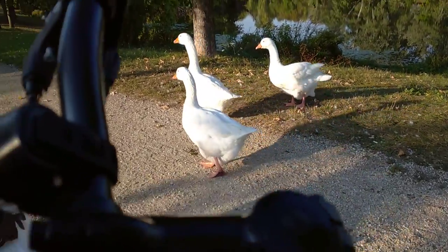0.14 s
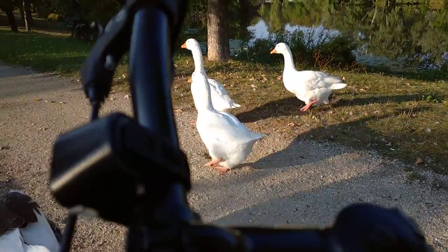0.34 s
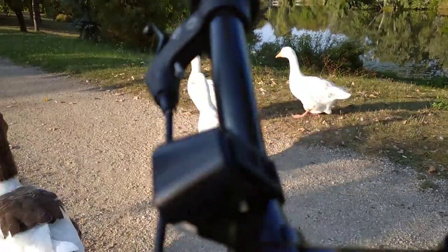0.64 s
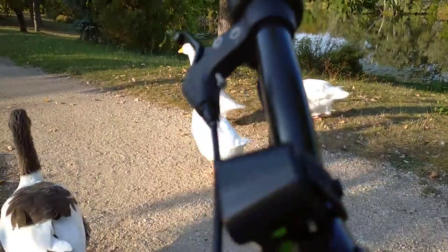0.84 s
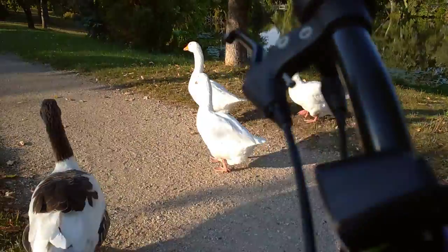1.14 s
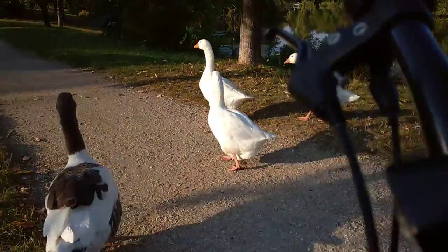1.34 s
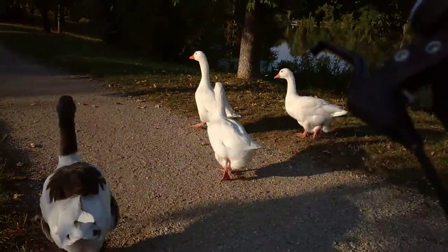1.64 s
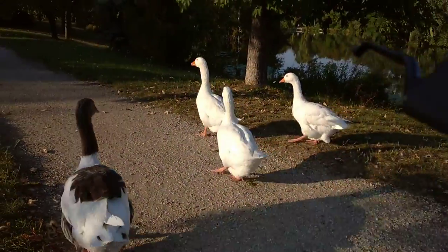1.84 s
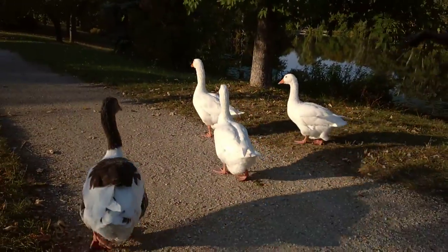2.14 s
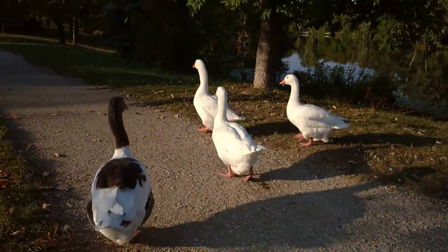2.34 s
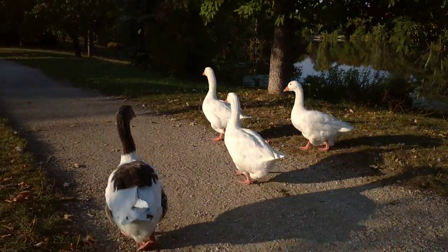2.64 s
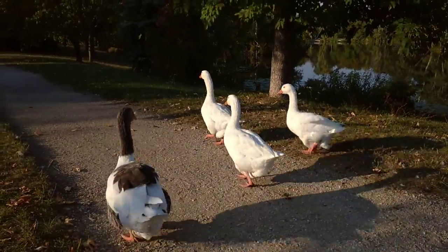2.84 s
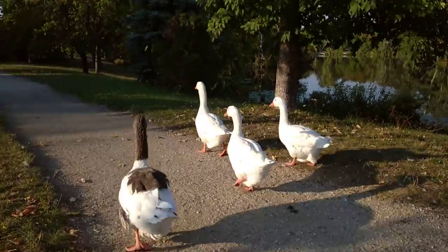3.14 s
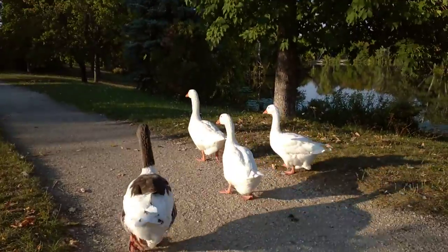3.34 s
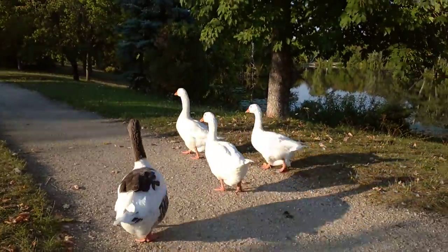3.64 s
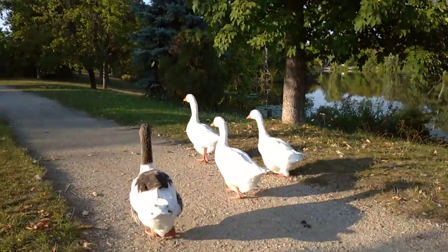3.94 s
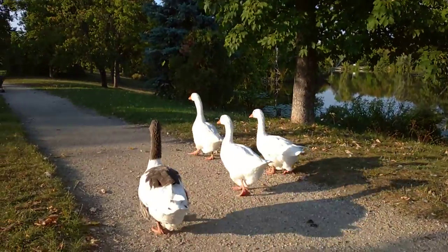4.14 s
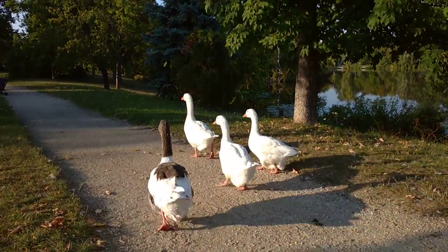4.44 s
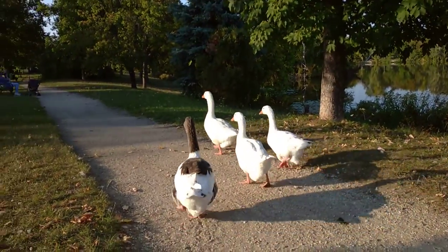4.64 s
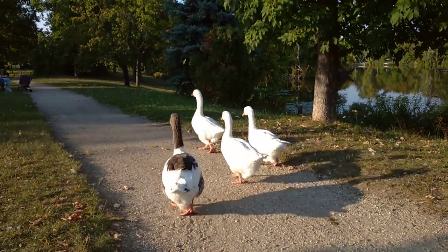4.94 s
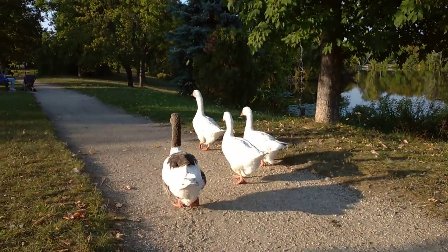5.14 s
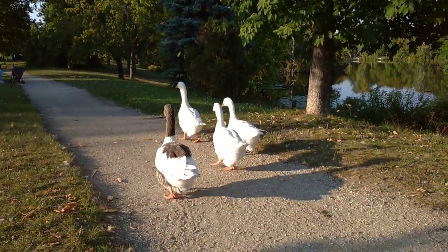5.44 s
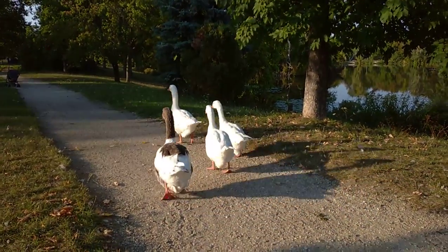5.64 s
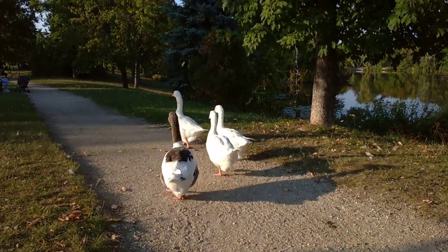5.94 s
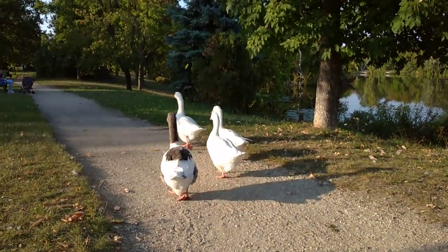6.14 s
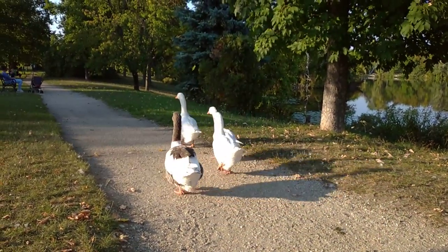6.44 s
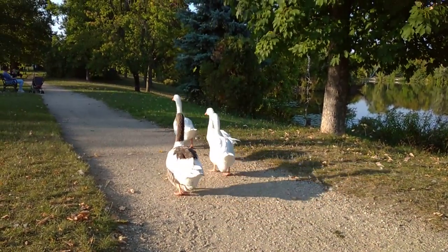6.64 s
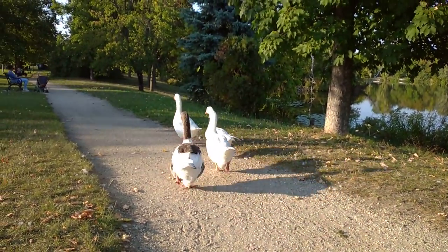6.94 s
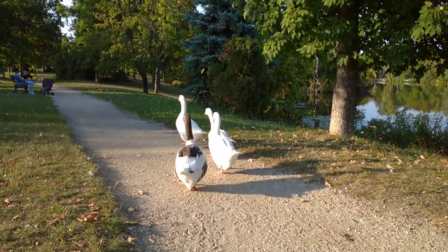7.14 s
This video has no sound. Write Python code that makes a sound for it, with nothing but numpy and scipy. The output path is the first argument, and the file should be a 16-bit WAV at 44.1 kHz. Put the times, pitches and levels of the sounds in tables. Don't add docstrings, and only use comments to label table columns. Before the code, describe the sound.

Quick runs of nasal goose honks, with pauses between, over crunching gravel, clicking stones and distant traffic in an open park.

```python
import sys
import numpy as np
from scipy import signal
from scipy.fft import rfft, irfft, next_fast_len
from scipy.io import wavfile
from scipy.ndimage import uniform_filter1d, map_coordinates

SR = 44100
rng = np.random.default_rng(int(sys.argv[2]) if len(sys.argv) > 2 else 0)


def wrap_up_sound(samples):
    columns = np.atleast_2d(samples).T
    tamed = np.clip(columns, -1, 1)
    steps = np.round(tamed * 32767).astype(np.int16)
    wavfile.write(sys.argv[1], SR, steps)


def boost_factor(decibels):
    exponent = np.asarray(decibels, float) / 20
    return 10 ** exponent


N = 321048

# start_s, length_s, crest_db, upper_re_windpipe_db, upper_pitch_hz (both at the crest)
GANDER_HONKS = [(.303, 0.03, -47, -5, 962), (.638, 0.064, -39, -7.5, 994.6), (.799, 0.069, -35, -5, 1006),
                (.957, .071, -29, 8, 988.1), (1.118, 0.07, -31.5, 6, 999.4),
                (1.288, 0.081, -32.5, -3, 954.4), (1.467, 0.065, -28.5, 7.5, 993),
                (2.203, 0.069, -43, -0.5, 969.5), (2.535, 0.053, -44, 3, 964.5),
                (2.739, 0.053, -36, -5.5, 979), (2.891, 0.067, -40, -6.5, 1018),
                (3.029, 0.069, -28.5, 9.5, 1045), (3.187, 0.061, -39.5, -2, 1022),
                (3.328, 0.071, -34, 2.5, 1026), (3.486, .073, -39.5, -2, 996),
                (3.663, 0.091, -32.5, -3, 1027), (5.642, 0.043, -36.5, 6.5, 1034),
                (5.8, 0.063, -42, 2.5, 1012), (5.956, 0.062, -36.5, 9, 1012),
                (6.111, 0.066, -36.5, 8, 1023), (6.278, 0.059, -42, 2.5, 966),
                (6.445, 0.071, -35.5, 7.5, 1006)]
GOOSE_HONKS = [(-0.045, 0.094, -31.5, 7.85, 947.6), (0.173, 0.047, -42, 2, 927.6),
               (0.328, 0.058, -31.5, 10.4, 896), (0.533, 0.036, -50.5, 14.8, 893),
               (0.705, 0.046, -34, 12.9, 900), (0.898, 0.049, -45.5, 15.5, 889),
               (1.08, 0.03, -46, 16.8, 883), (1.805, 0.035, -43.5, 9.97, 884),
               (1.959, 0.059, -45, 6.6, 940.6), (2.146, 0.061, -35.5, 11.87, 917.5),
               (2.318, 0.045, -45, 6.55, 939), (2.482, 0.05, -30.5, 13.3, 941.6),
               (2.702, 0.028, -47.0, 9.3, 920), (3.798, 0.04, -49.5, 12.4, 904.5),
               (3.952, 0.06, -34.5, 15.7, 929.4), (4.126, 0.048, -51.5, 6, 956.5),
               (4.29, 0.06, -35, 23.2, 958.5), (4.474, 0.041, -46, 14.3, 927),
               (4.64, 0.066, -38, 10.8, 931)]
GANDER_CYCLES = [8, 8, 7, 6, 6, 7, 6, 11, 11, 6, 8, 6, 8, 6, 8, 8, 6, 7, 8, 7, 7, 7]
GOOSE_CYCLES = [4, 4, 6, 5, 4, 4, 4, 4, 4, 6, 4, 6, 6, 7, 4, 5, 6, 4, 6]
GANDER_ROUGHNESS = [.2, .2, .19, .17, .19, .21, .19, .05, .08, .2, .16, .14, .15, .12, .15, .28, .2, .28,
                    .2, .22, .28, .28]
GOOSE_ROUGHNESS = [.04, .15, .18, .1, .05, .1, .1, .12, .12, .2, .11, .22, .15, .15, .16, .11, .16, .12,
                   .18]
GANDER_NECK = [0.003, .02, 0.0027, -0.015, .025, 0.015, 0.021, 0.012, -0.0065, -0.053, 0.028, .02, -0.0018,
               0.0042, -0.034, 0.033, 0.012, -0.052, -0.053, 0.022, -0.036, -0.029]
# centre_hz, width_hz, level_db
GANDER_WINDPIPE = [(504, 9.3, -1), (655.6, 33, 3), (906, 319, -11)]
GOOSE_WINDPIPE = [(488, 29, 14), (745, 94, 3.5), (900, 370, -58)]
# centre_hz, width_hz, level_db
GANDER_BEAKS = [
    [(1230, 330, 1), (1536, 48, 6.5), (1760, 185, 1), (2594, 120, 1), (3196, 180, 2), (4470, 170, -2),
     (5380, 370, -6)],
    [(1240, 780, 4.5), (1630, 480, 5.5), (1892, 150, 10.5), (2660, 136, 5), (2990, 180, 5.5),
     (3490, 180, 5), (4320, 570, -2), (5730, 210, 4)],
    [(1197, 250, 4), (1627, 270, 5), (2080, 370, -0.5), (2680, 130, 1.5), (2981, 200, 3), (4230, 460, -0.5),
     (5430, 210, 0.5)],
]
GOOSE_BEAKS = [
    [(1425, 135, 6.5), (1770, 91, 9.5), (2130, 83, 3.5), (2474, 105, 5), (3170, 170, 3.5), (3930, 170, 2),
     (4240, 220, 4.5), (5400, 330, -3)],
    [(1141, 130, -8.5), (1400, 250, -7), (1855, 130, -2), (2189, 143, -4.5), (2956, 161, -7),
     (3930, 96, -6.5), (4310, 184, -8.5), (5060, 181, -12)],
    [(1499, 133, 3), (2006, 140, -2), (2186, 98, -1.5), (2473, 108, -3.5), (2880, 151, -5.5),
     (4403, 210, -2.5), (5710, 310, -10)],
]
# start_s, crest_s, end_s, pitch_hz, level_db
WHISTLE = (.34, .372, .43, 2130, -56)
# frequency_hz, left_minus_right_db
VOICE_BALANCE = [(400, -1), (1300, 5.5), (2400, -12.5), (4400, -1)]

# frequency_hz, density_db (per Hz)
HUM_SPECTRUM = [(30, -27), (85, 1), (238, 1.5), (300, -4), (360, -9.5), (604, -4), (804, -8), (989, -2),
                (1220, -5), (2150, -10.5), (2500, -18), (4320, -20), (5050, -26.5), (8480, -25.5),
                (14600, -62)]
# frequency_hz, left_minus_right_db
HUM_BALANCE = [(200, 15), (400, 10), (700, -0.5), (2400, 2.5), (4400, -4.5), (8100, -11.5), (14000, 62)]
# frequency_hz, correlation (0-1)
HUM_LIKENESS = [(60, 1), (250, 1), (640, 0.2), (1400, 0.0027)]
# time_s, level_db
HUM_LEVEL = [(0.0, -54.5), (1.03, -53), (2.47, -53), (4.22, -53), (5.17, -52.5), (5.72, -51), (6.99, -54.5),
             (7.28, -54)]

# crest_s, peak_db, hold_s
FOOTFALLS = [(0.017, -61.5, 0.043), (0.256, -61, 0.019), (0.43, -63, 0.051), (0.568, -64.5, 0.087),
             (0.73, -64.5, 0.09), (0.84, -68, 0.016), (1.014, -65, 0.062), (1.188, -68, 0.061),
             (1.353, -64, 0.028), (1.524, -112.5, 0.069), (1.777, -65, 0.18), (2.19, -69.5, 0.1),
             (2.348, -64.5, 0.037), (2.534, -66.5, 0.053), (2.896, -66, 0.036), (3.083, -60.5, 0.038),
             (3.204, -62, 0.036), (3.359, -60.5, 0.016), (3.523, -60, 0.042), (3.608, -54.5, 0.054),
             (3.801, -61.5, 0.034), (3.999, -64.5, 0.1), (4.175, -64, 0.13), (4.348, -61.5, 0.085),
             (4.706, -66.5, 0.089), (4.907, -65.5, 0.028), (5.281, -62, 0.032), (5.433, -65.5, 0.033),
             (5.922, -63.5, 0.049), (6.516, -62, 0.024)]
LATE_FOOTFALLS = [
    (5.102, -70, 0.074),
    (5.56, -69.5, 0.034),
    (5.729, -74, 0.1),
    (6.019, -69, 0.042),
    (6.16, -71, 0.046),
    (6.37, -68.5, 0.029),
    (6.8, -71, 0.13),
    (7.049, -65, 0.05),
]
# frequency_hz, density_db (per Hz)
GRIT_SPECTRUM = [(880, -14.5), (1800, -4), (3000, -5), (4300, -1.5), (5600, -5.5), (8580, 0),
                 (10600, -10.5), (13800, -8), (14600, -84)]
# frequency_hz, left_minus_right_db
GRIT_BALANCE = [(2000, 6), (4400, 7), (8500, 14), (13000, 11)]
# time_s, peak_db, pitch_hz,
# left_minus_right_db
STONES = [(0.599, -41, 7750, 8), (1.6691, -68, 3615, -2), (1.67, -40, 9000, 0),
          (1.7864, -30, 8200, 7), (1.838, -42, 4110, 7), (1.869, -43, 8850, 6), (1.947, -49, 8800, 3),
          (2.0413, -59, 7900, 21), (2.3556, -41.5, 8795, 21), (2.432, -44, 11330, 10),
          (2.9809, -45.5, 8750, 11), (3.2519, -39.5, 8600, 15), (3.3516, -32.5, 8505, 6),
          (3.4865, -47, 8900, -8), (3.543, -45, 8640, 5), (3.644, -36, 8910, 9),
          (3.678, -43, 4710, 1.5), (3.7304, -35, 4314, 3), (3.873, -44.5, 8610, 13),
          (3.952, -43, 8790, 10), (4.531, -40, 4700, 10), (5.263, -44, 7840, 0),
          (5.3583, -44.5, 8460, 15), (5.395, -49, 4040, -24), (5.436, -41, 7500, 3),
          (5.596, -52.5, 3930, -22), (5.7412, -38, 3960, -5), (5.8953, -38.5, 4030, -6),
          (5.9269, -57, 8800, 7), (5.94, -45, 4686, 0)]
MORE_STONES = [(0.413, -42.5, 4530, 4.5), (0.6738, -45, 6850, 4.0), (1.5584, -50, 3807, -2),
               (1.5862, -51, 7700, 4), (1.6804, -48, 7570, 0), (1.8404, -40, 8280, 4),
               (1.8971, -44, 4580, -2), (1.9544, -52, 4365, 1.5), (2.0651, -50, 3890, -1),
               (2.134, -48, 3930, 1.5), (2.1858, -39, 3840, -0.5), (2.2322, -46, 3895, 1.5),
               (2.3924, -57, 8270, -0.5), (2.7196, -69, 4300, 11), (2.8808, -42.5, 8753, 6),
               (3.2674, -52, 4740, 3.5), (3.454, -51, 8900, 5), (3.6034, -36, 8900, 12),
               (3.6274, -32, 8600, 15), (3.6654, -54, 4700, 2.0), (4.29, -48, 8940, 2.5),
               (5.0528, -54, 4240, -8), (5.4044, -53, 4060, -7.5), (5.4524, -47, 7590, -4),
               (5.5362, -51, 3940, 2.0), (5.853, -53, 5100, -9), (5.8874, -42, 8245, 6),
               (5.9004, -40.5, 8710, 17), (5.9514, -40, 11310, 4), (5.9604, -56, 4230, 2.5),
               (6.6811, -48.5, 4258, 3.5)]
FURTHER_STONES = [(0.2279, -51, 8410, 8.5), (0.4012, -41, 7740, 6.0), (0.7302, -39, 4220, 2.5),
                  (0.7696, -42, 8150, 7.0), (0.927, -49, 4230, 5), (1.6362, -59, 7610, 1.0),
                  (1.72, -39, 7500, 2), (1.7553, -43, 8420, 3.0), (6.0255, -59, 8180, 3.0),
                  (6.35, -48, 4240, 1.5), (6.4994, -49, 8620, 1.5), (6.6672, -55, 7490, -2),
                  (7.205, -59, 3750, 2.0)]

# start_s, pitch_hz, level_db, t60_s
JOLT = (2.5, 165, -52, .12)
# time_s, firing_hz, first_order_db, second_order_db
LORRY_ENGINE = [(2.6, 54, -78, -72), (3.0, 56.08, -83, -78), (3.8, 62.25, -82, -56), (4.62, 72, -66, -55),
                (4.8, 74.2, -66, -74), (5.15, 79.7, -61.5, -78), (5.7, 89.6, -56, -62),
                (5.85, 90.1, -72, -72), (6.65, 101, -53, -75), (6.8, 100.3, -67, -69), (7.28, 88, -54, -69)]
# frequency_hz, lost_share (0-1)
LOST_DETAIL = [(2400, 0), (3000, .04), (4600, .05), (5200, .26), (6600, .16), (8500, .03), (10500, .14),
               (13500, .26), (14300, .2), (14400, 0)]

TOP_HZ = 14300
LEAD_S, ATTACK_S, RELEASE_S, FADE_S = .007, .009, .011, .022
EDGE_DB, CUT_DB, SILENT_DB = -12, -3, -39
HELD_BACK = .65
HOLD = .12
LOUDEST_HONK = 11
SLOWS, DULLS = .22, .4
YIELDS = .4
LINGER_S, LINGER = .016, .55
SINK_DB_PER_S, SETTLE_DB_PER_S, STIR_DB = 285, 232, -75.5


def seconds():
    return np.arange(N) / SR


def unit(x):
    return x / np.sqrt(np.mean(np.abs(x) ** 2) + 1e-20)


def steady(x, window_s=0.0179):
    power = uniform_filter1d(np.abs(x) ** 2, round(window_s * SR))
    return x / np.sqrt(np.abs(power) + 1e-12)


def along(points, hz):
    f, v = np.transpose(points)
    return np.interp(np.log(hz + 1), np.log(f + 1), v)


def curve(rows, column=1):
    rows = np.asarray(rows)
    return np.interp(seconds(), rows[:, 0], rows[:, column])


def wobble(rate):
    at = np.arange(0, N + 16, 16)
    knots = rng.standard_normal(int(N * rate / SR) + 4)
    return np.interp(np.arange(N), at, map_coordinates(knots, [at * rate / SR]))


def filtered(x, response):
    m = next_fast_len(N + SR // 2)
    return irfft(rfft(x, m) * response(np.fft.rfftfreq(m, 1 / SR)), m)[..., :N]


def modes(table):
    def ring(f):
        total = 0
        for k, (centre, width, db) in enumerate(table):
            resonance = 1j * f * width / (centre * centre - f * f + 1j * f * width)
            total = total + (-1) ** k * boost_factor(db) * resonance
        return total
    return lambda f: np.interp(f, f[::8], ring(f[::8]))


def panned(pair, balance):
    return filtered(pair, lambda hz: boost_factor(np.outer([.5, -.5], along(balance, hz))) * (hz < TOP_HZ))


def smooth_field(shape, wide, long):
    field = uniform_filter1d(rng.standard_normal(shape), wide, axis=0)
    return unit(uniform_filter1d(field, long, axis=1))


def patchy(depth_db, wide, long):
    z = signal.stft(rng.standard_normal((2, N)), nperseg=512)[2]
    gain = boost_factor(depth_db * smooth_field(z.shape[1:], wide, long))
    return signal.istft(z * gain, nperseg=512)[1][:, :N]


def effort(calls, crest, by_level, by_push, swell_db_per_s, rest_db, keeps, lag, rise, fall,
           sag_hz_per_s, droop_hz, shut_db, scoop_hz, early):
    loud, upper, pitch = [], [], []
    for k, (s, length, db, push_db, hz) in enumerate(calls):
        top = length * np.clip(crest + by_level * (db + 40) / 10 + by_push * push_db / 10, .2, .78)
        opened = min(ATTACK_S, top / 3)
        held = top + HOLD * length
        times = [-LEAD_S, 0, opened, top - HOLD * length, top + HOLD * length / 2,
                 max(length - RELEASE_S, held), length, length + FADE_S]
        restraint = HELD_BACK * max(push_db, 0) * (k != early)
        opening_db = max(-swell_db_per_s * (top - opened) - restraint, EDGE_DB)
        levels = [SILENT_DB, EDGE_DB, opening_db, -1, -1, CUT_DB, EDGE_DB, SILENT_DB]
        loud += [(s + t, db + d) for t, d in zip(times, levels)]

        slack_db = rest_db + keeps * push_db
        peak = s + top + lag * length
        slack_again = peak + fall * length
        upper += [(s - LEAD_S, slack_db + shut_db / 2),
                  (max(peak - (rise + (k == early)) * length, s), push_db - 4 if k == early else slack_db),
                  (peak - HOLD * length, push_db - 2), (peak, push_db),
                  (slack_again, slack_db), (slack_again + .012, slack_db + shut_db)]

        high_hz = hz + sag_hz_per_s * top / 2
        last_hz = hz - sag_hz_per_s * (length - top)
        pitch += [(s, high_hz - scoop_hz), (s + top / 2, high_hz),
                  (s + length, last_hz), (s + length + FADE_S, last_hz - droop_hz)]
    return curve(loud), curve(upper), curve(pitch)


def honks(calls, lungs, cycles, roughs, pipe, beaks, turns_s, upper_hz_width, beak_db, lock_db,
          half, second, clear, glide, bends, eager, deep_db):
    loud_db, upper_db, hz = lungs
    starts, lengths, crests_db = np.transpose(calls)[:3]
    t = seconds()
    which = np.maximum(np.searchsorted(starts - LEAD_S, t) - 1, 0)
    step, rough = np.asarray(cycles)[which], np.asarray(roughs)[which]
    done = np.clip((t - starts[which]) / lengths[which], 0, 1)
    under_db = np.maximum(loud_db - crests_db[which], EDGE_DB)

    lock = 1 / (1 + boost_factor(lock_db - upper_db) ** 3)
    slowing = boost_factor(SLOWS * (1 - lock) * (step < 10) * under_db)
    jitter = np.exp(.5 * rough * (1 - lock) * wobble(170))
    beat = np.cumsum(hz / step * slowing * jitter) / SR
    size = boost_factor(9 * rough * (1 - lock / 2) * rng.standard_normal(N)) * np.sqrt(step)
    pulses = unit(np.diff(np.floor(beat), prepend=0) * size)
    breath = unit(rng.standard_normal(N) * np.exp(-2 * (beat % 1)))
    drive = pulses + .9 * rough * breath

    spin = np.exp(2j * np.pi * np.cumsum(hz * (1 + 0.00368 * wobble(90))) / SR)
    pole = np.exp(-np.pi * upper_hz_width / SR)
    ring = signal.lfilter([1], np.poly([pole, pole]), drive / spin)
    upper = np.sqrt(2) * np.real(spin * steady((1 - lock) ** 0.88 * steady(ring) + np.sqrt(lock)))
    halves = np.exp(1j * np.pi * np.cumsum(hz) / SR)
    subharmonics = half * (halves + 2.0 * halves ** 3)
    overtones = np.real(second * np.sqrt(lock) * spin ** 2)
    overtones = overtones + lock * np.real(.04 * spin ** 3 + .025 * spin ** 4 + subharmonics)

    reach = .06
    bend = np.broadcast_to(bends, len(calls))[which]
    neck = np.clip(.5 + bend * (2 * done - 1) / reach / 2, 0, 1)

    def windpipe(f):
        band = 1 / (1 + (400 / (f + 1)) ** 8) / (1 + (f / 900) ** 6)
        necks = [modes(pipe[1:])(f * k) for k in (1 + reach, 1, 1 - reach)]
        return band * [modes(pipe[:1])(f), *necks]

    deep, long, middle, short = filtered(drive, windpipe)
    hoarse = np.maximum(1 - 2 * neck, 0) * long + (1 - abs(2 * neck - 1)) * middle
    hoarse = hoarse + np.maximum(2 * neck - 1, 0) * short
    has_deep = (rough < clear) & (step < 10)
    low = steady(has_deep * boost_factor(deep_db) * steady(deep) - steady(hoarse))

    gape = np.searchsorted(turns_s, t)
    hiss = pulses + (.15 + 2.4 * rough) * breath

    def through_beak(k):
        edges = lambda f: 1 / (1 + (1050 / (f + 1)) ** 8) / (1 + (f / 7500) ** 6)
        heads = filtered(hiss, lambda f: [modes(beak)(f * k) ** 2 * edges(f) for beak in beaks])
        return np.choose(gape, heads)

    high = steady((1 - done) * through_beak(1 + glide) + done * through_beak(1 - glide))
    both = np.sqrt(1 + boost_factor(upper_db) ** 2)
    tone = ((1 - YIELDS * lock) * low + boost_factor(upper_db) * (upper + overtones)) / both
    gust = boost_factor(loud_db + DULLS * under_db * (done > eager))
    keep = np.exp(-1 / (LINGER_S * SR))
    gust = np.maximum(gust, LINGER * signal.lfilter([1 - keep], [1, -keep], gust))
    return boost_factor(1.3 * (1 - lock) * wobble(75)) * (boost_factor(loud_db) * tone + boost_factor(beak_db) * gust * high)


def squeak():
    start, crest, end, hz, db = WHISTLE
    shape_db = np.interp(seconds(), [start, crest, end, end + .02], [-38, 3.5, -8, -60], left=-120, right=-120)
    level = boost_factor(db + shape_db + 1.8 * wobble(66))
    return level * np.sin(2 * np.pi * np.cumsum(hz * (1 + 0.0044 * wobble(79.0))) / SR)


def park(x):
    t = np.arange(SR // 3) / SR
    tail = rng.standard_normal((2, len(t))) * boost_factor(-60 * t / 0.097) * (t > .004)
    return signal.fftconvolve(x[None], tail / np.linalg.norm(tail[0]), axes=1)[:, :N]


def geese():
    t = seconds()
    gander_turns_s, goose_turns_s = [2.0, 4.8], [1.6, 3.0]
    lungs = effort(GANDER_HONKS, crest=.55, by_level=.05, by_push=0.16, swell_db_per_s=190.5, rest_db=-3.5,
                   keeps=.1, lag=.1, rise=.2, fall=.4, sag_hz_per_s=1000, droop_hz=29.9, shut_db=-9,
                   scoop_hz=55.26, early=LOUDEST_HONK)
    gander = honks(GANDER_HONKS, lungs, GANDER_CYCLES, GANDER_ROUGHNESS, GANDER_WINDPIPE, GANDER_BEAKS,
                   gander_turns_s, upper_hz_width=174, beak_db=-17.0 + 2.1 * (t > gander_turns_s[1]),
                   lock_db=3, half=0.023, second=0.031, clear=.28, glide=0.027, bends=GANDER_NECK,
                   eager=0, deep_db=-6.5 - 0.87 * t)
    lungs = effort(GOOSE_HONKS, crest=.5, by_level=0.27, by_push=0.0082, swell_db_per_s=168.5, rest_db=-3.5,
                   keeps=.3, lag=.04, rise=0.31, fall=0.77, sag_hz_per_s=2100, droop_hz=69.1, shut_db=-3.0,
                   scoop_hz=45.36, early=None)
    goose = honks(GOOSE_HONKS, lungs, GOOSE_CYCLES, GOOSE_ROUGHNESS, GOOSE_WINDPIPE, GOOSE_BEAKS,
                  goose_turns_s, upper_hz_width=108, beak_db=-12.0 - 0.96 * np.maximum(t - 2.6, 0),
                  lock_db=7, half=0.046 + 0.06 * (t > 3), second=0.028 + 0.46 * (abs(t - 1.9) < .2),
                  clear=.11, glide=-0.019, bends=-0.013, eager=0.6, deep_db=1.5)
    both = gander + goose + squeak()
    echo = park(filtered(both, lambda f: 1 / (1 + (700 / (f + 1)) ** 4)))
    return panned(np.array([both, both]) + boost_factor(-8.5) * echo, VOICE_BALANCE)


def hum():
    turn = lambda hz: np.arccos(np.clip(along(HUM_LIKENESS, hz), -1, 1)) / 2
    colour = lambda hz: boost_factor(along(HUM_SPECTRUM, hz)) * [np.cos(turn(hz)), np.sin(turn(hz))]
    middle, side = filtered(patchy(1.56, wide=6, long=14), colour)
    pair = np.array([middle + side, middle - side])
    return boost_factor(curve(HUM_LEVEL)) * unit(panned(pair, HUM_BALANCE))


def crunch_db():
    t = np.arange(0, N / SR, 1 / 1000)
    power = boost_factor(STIR_DB) ** 2
    for s, db, hold in [*FOOTFALLS, *LATE_FOOTFALLS]:
        before = np.maximum(s - hold / 2 - t, 0)
        after = np.maximum(t - s - hold / 2, 0)
        power = power + boost_factor(db - SINK_DB_PER_S * before - SETTLE_DB_PER_S * after) ** 2
    return np.interp(seconds(), t, 10 * np.log10(power))


def gravel():
    clumps = boost_factor(2.4 * wobble(60) + 2.8 * wobble(250))
    cracks = (rng.random(N) < 160 / SR) * np.minimum(rng.exponential(0.38, N), 2.6)
    spikes = 1 + 1.72 * signal.lfilter([1], [1, -np.exp(-1 / (0.00051 * SR))], cracks)
    a, b = patchy(1.04, wide=14, long=3)
    grit = unit(clumps * spikes * np.array([a, .5 * np.roll(a, shift=-2) + 2.66 * b]))
    grit = unit(filtered(grit, lambda hz: boost_factor(along(GRIT_SPECTRUM, hz))))
    out = boost_factor(crunch_db() + 9.5) * panned(grit, GRIT_BALANCE)
    t = np.arange(512) / SR
    for s, db, hz, pan_db in [*STONES, *MORE_STONES, *FURTHER_STONES]:
        snap = np.diff(rng.standard_normal((2, 513))) * boost_factor(-60 * t / .0035) * .6 * (hz / 8000)
        snap = snap + np.sin(2 * np.pi * hz * t) * boost_factor(-60 * t / 0.004) * (1 - np.exp(-t / .0001))
        at = round(s * SR)
        out[:, at:at + 512] += boost_factor(db + 2.5 + np.array([[.5], [-.5]]) * pan_db) * snap
    return filtered(out, lambda hz: 1 / (1 + (hz / 14500) ** 40))


def bump():
    s, hz, db, t60 = JOLT
    t = np.maximum(seconds() - s, 0)
    decay = boost_factor(db - 60 * t / t60 + np.array([[3], [-11]]))
    return decay * np.sin(2 * np.pi * hz * t) * (1 - np.exp(-t / 0.01))


def lorry():
    turn = 2 * np.pi * np.cumsum(curve(LORRY_ENGINE) * (1 + 0.0041 * wobble(5.6))) / SR
    first = boost_factor(curve(LORRY_ENGINE, column=2) + 0.82 * wobble(8.9))
    second = boost_factor(curve(LORRY_ENGINE, column=3) + 2.5 * wobble(5.7))
    rumble = filtered(patchy(0.8, wide=2, long=20)[0], lambda f: modes([(85, 60, 0)])(f) ** 2)
    engine = first * (np.sin(turn) + 0.34 * unit(rumble)) + second * np.sin(2 * turn)
    near = np.interp(seconds(), [2.5, 3.2], [0, 1])
    return boost_factor(np.array([[3], [-11]])) * near * engine


def scene():
    return geese() + hum() + gravel() + bump() + lorry()


def thinned(x):
    hz, _, z = signal.stft(x, SR, nperseg=2048)
    rank = 1 / (1 + np.exp(-1.7 * smooth_field(z.shape[1:], wide=10, long=4)))
    return signal.istft(z * (rank >= along(LOST_DETAIL, hz)[:, None]), SR, nperseg=2048)[1][:, :N]


def band_limit(x):
    return signal.sosfilt(signal.butter(12, 15620, fs=SR, output="sos"), x)


def record(dry):
    mix = thinned(dry)
    return band_limit(mix)


dry = scene()
out = record(dry)
wrap_up_sound(out)
```